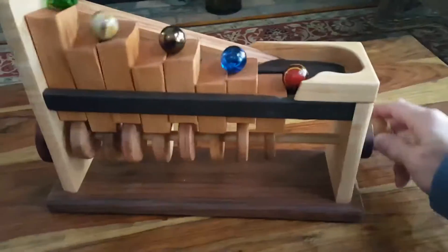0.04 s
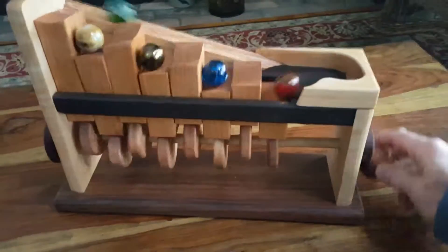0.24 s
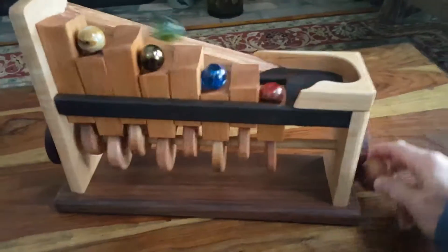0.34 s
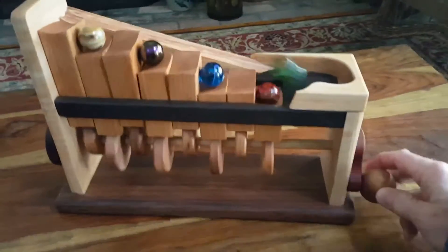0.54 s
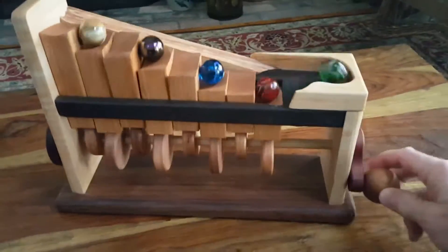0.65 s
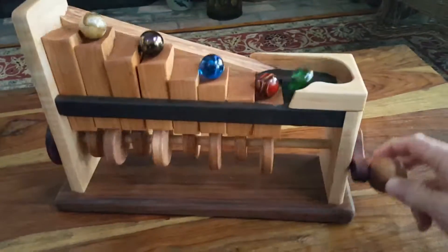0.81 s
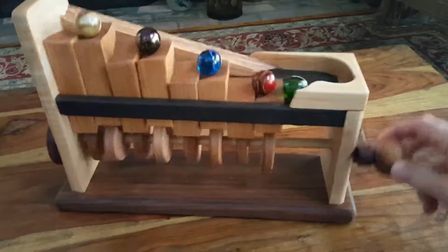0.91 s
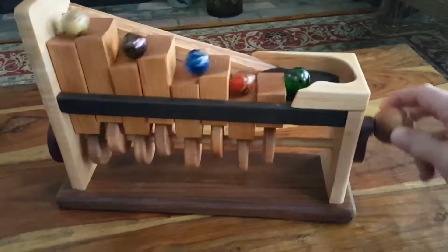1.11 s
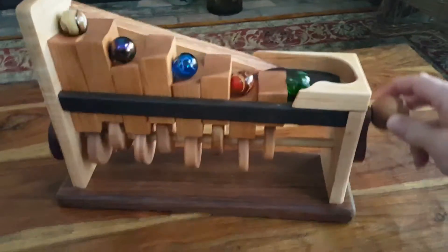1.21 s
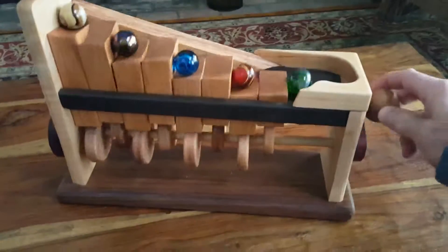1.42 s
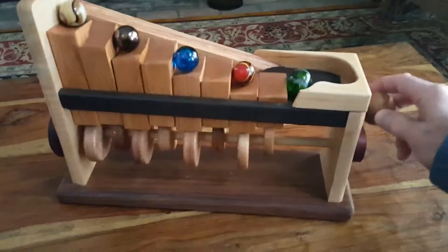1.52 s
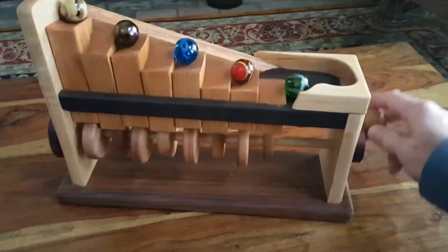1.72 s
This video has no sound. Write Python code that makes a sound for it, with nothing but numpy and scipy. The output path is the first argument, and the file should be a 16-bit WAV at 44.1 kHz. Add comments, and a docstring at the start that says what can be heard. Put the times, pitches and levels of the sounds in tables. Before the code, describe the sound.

Marbles knock irregularly against wood in a cranked marble machine on an indoor table. One rolls down the ramp and rattles into the tray with quickening bounces. A hollow knock follows, and the axle gives a faint groan.

```python
"""A glass marble clicks down the ramp of a hand-cranked wooden marble machine, drops into the tray and
bounces to rest. Each impact excites the damped modes of the wood it strikes and of the table below.
Cams lift stair blocks, and other marbles clack from step to step. The turning axle rumbles through
the table and groans once, with a squeak. A small room reverberates the impacts over a faint hiss."""
import sys
import numpy as np
from scipy import signal
from scipy.io import wavfile
from scipy.ndimage import uniform_filter1d, minimum_filter1d

SR = 44100
rng = np.random.default_rng(int(sys.argv[2]) if len(sys.argv) > 2 else 0)


def wav_record(signal):
    """Record a signal, one row per channel, as 16-bit PCM in the file named by sys.argv[1]."""
    frames = np.transpose(np.atleast_2d(signal))
    bounded = np.clip(frames, -1, 1)
    # unit amplitude maps onto the largest positive 16-bit level
    quanta = np.round(bounded * 32767).astype(np.int16)
    wavfile.write(sys.argv[1], SR, quanta)


N = 77175
TIME = np.arange(N) / SR

# Spectra of the noises and reflections. Each row: frequency in Hz, relative level in dB.
HISS_SPECTRUM = [(30, -49), (300, -1.5), (1500, 8.5), (3500, -6.5), (7000, -15.5), (10000, -21),
                 (13000, -14), (16000, -19.5)]
EARLY_SPECTRUM = [(150, -15.5), (700, 18), (1700, -5), (3000, -6), (6000, 3.5), (14000, -3)]
TAIL_SPECTRUM = [(100, -6), (300, -2.5), (700, 0.5), (1400, 1), (1700, -10), (1950, 0), (2600, -5.5),
                 (3600, -4.5), (6000, 0.5), (14000, -5.5)]
RUMBLE_SPECTRUM = [(25, -23.5), (60, -45.5), (95, -23.5), (125, -4.5), (155, -0.5), (185, -7), (250, -4),
                   (300, -12.5), (360, -18.5), (700, -19.5), (1500, -33), (4000, -53.5)]
ROLL_SPECTRUM = [(50, -31), (150, -20), (270, 0.5), (370, -13.5), (480, 6.5), (590, -1.5), (710, 5.5),
                 (1000, -2.5), (1350, -2.5), (1600, 6), (2100, -2.5), (2700, -13.5), (4000, -17.5),
                 (7500, -51), (16000, -72.5)]
CRACK_SPECTRUM = [(300, -26), (1500, -10), (3300, 9.5), (4500, -2.5), (6200, -8.5), (7400, -15.5),
                  (8300, -9), (10200, -23.5), (11500, -22), (12800, -18), (14000, -26), (16000, -35)]
# Reverberation of the room. Each row: frequency in Hz, 60 dB decay time in seconds.
ROOM_DECAY = [(150, 0.27), (400, 0.63), (1000, 0.32), (1950, 0.49), (3500, 0.48), (7000, 0.3),
              (14000, 0.28)]
# Envelopes of the axle and the rolling marble. Each row: time in seconds, level in dB.
RUMBLE_LEVELS = [(0, -39), (.09, -48), (.15, -42.5), (.45, -45), (.6, -41.5), (.82, -39), (1.0, -43.5),
                 (1.12, -52), (1.3, -44), (1.5, -51), (1.65, -47.5), (1.75, -41.5)]
ROLL_LEVELS = [(0, -52.5), (.14, -62), (.2, -48.5), (.25, -38), (.36, -37.5), (.45, -35), (.54, -35),
               (.6, -48.5), (.68, -31), (.9, -43), (1.0, -39), (1.04, -59), (1.5, -57), (1.62, -53),
               (1.75, -52)]
# Modes of the wooden parts. Each row: frequency in Hz, relative level in dB, 60 dB decay time in seconds.
TABLE_MODES = [(85.5, -40.5, .1), (129, -12.5, 0.2), (155.7, -5.5, .17), (236.8, -3.5, 0.057),
               (272.5, 0.5, 0.085), (315, -2, 0.023)]
BLOCK_MODES = [(508, -21, 0.027), (689, -17, 0.044), (960, -14.5, 0.036), (1204, -14, 0.026),
               (1535, -3, 0.039), (1604, -2.5, 0.018), (1845, -1.5, 0.016), (1940, -5, 0.011),
               (2297, -6, 0.03), (2500, -20, 0.01), (2600, -19.5, 0.011), (2940, -3, 0.0064),
               (3530, -9.5, 0.025), (3790, -7.5, 0.0094)]
STAIR_TOP_MODES = [(750, -24.5, 0.0067), (960, -30, 0.0097), (1153, 1, 0.012), (1188, 3, 0.013),
                   (1643, -12.5, 0.052), (1696, -5, 0.013), (2110, -9.5, 0.013), (2430, -11.5, 0.017),
                   (3020, -8.5, 0.0085), (2890, -14.5, 0.024), (3364, -2, 0.011)]
RAMP_MODES = [(703, -29.5, 0.06), (1300, -16, 0.0053), (1614, -12, .018), (1900, -5, 0.014),
              (2250, -6, 0.015), (2680, 2, 0.008), (2940, -6.5, 0.0089), (3190, -7, 0.0064),
              (3660, -7, 0.01), (5800, -22, .008), (7740, -24, .01)]
RIM_MODES = [(1560, -9.5, .015), (1900, -4, 0.022), (2420, -5, 0.013), (2700, -15.5, .012),
             (3160, -0.5, 0.0081), (3490, -9, 0.012)]
TRAY_MODES = [(475.6, -26, 0.066), (707, -24.5, .055), (960, -19.5, 0.012), (1170, -32, 0.0058),
              (1603, -1, 0.016), (1825, 3.5, 0.014), (1935, 3.5, 0.016), (1940, -19, 0.025),
              (2284, -15.5, 0.041), (2965, -8, 0.012), (2960, -40, 0.01), (3300, -8.5, 0.015),
              (3716, -16.5, 0.041)]
# Thin, high rings of a marble. Each row: start in seconds, level in dB, frequency in Hz.
MARBLE_PINGS = [(0.2313, -25.5, 5484), (.3106, -29, 5830), (1.238, -39, 5910)]
# Impacts on each part. Each row: start in seconds, ring gain in dB, contact cut-off in Hz,
# accent frequency in Hz, thud gain in dB, crack gain in dB, left over right in dB.
BLOCK_CLACKS = [(.0190, -30.5, 1500, 1140, -35, -67, 4), (.1596, -20, 2000, 1296, -27.5, -33.5, 3.4),
                (.2070, -26, 1800, 1390, -27, -43, 3), (.2165, -10.5, 3800, 2100, -29, -20.5, 3.4),
                (.2295, -34, 4000, 1660, -59, -25, 2.5), (.3170, -20, 2200, 1550, -53, -47, 4.6),
                (.3970, -21, 2600, 1700, -32, -25, 4.5), (.4415, -22, 2800, 2270, -27.5, -31.5, 5.1),
                (.4757, -18, 2600, 1980, -34, -26.5, 2.1), (.4985, -37, 2400, 1580, -34.5, -33, 3.8),
                (.5160, -16, 2300, 1830, -35, -26, 4.8), (.5315, -50, 1900, 1590, -40, -54, 2.6),
                (.5590, -16.5, 2200, 1840, -39, -17, 7), (1.2395, -17, 3000, 1390, -50, -25, 2.5),
                (1.2852, -18, 2800, 2020, -38.5, -24.5, 3), (1.6090, -29.5, 1900, 1530, -41.5, -65, 2.5),
                (1.6430, -37, 1600, 1600, -78, -65.5, 4.5), (1.6770, -45, 1700, 1560, -41, -49, 1.5)]
STAIR_TOP_KNOCKS = [(.0315, -28, 1670, 1190, -45, -64, 4.2), (.2330, -4, 2400, 1700, -28, -17, 5.1),
                    (1.2225, -3, 1950, 1102, -33, -23.5, 4), (1.3065, -15, 1185, 1190, -42, -61, 1.5)]  # hollow knocks at the top of the stairs
RAMP_CLICKS = [(.2528, -22.5, 4500, 2985, -45, -37.5, 3.3), (.2854, -12.5, 5000, 3000, -31.5, -15, 6),
               (.3105, -14.5, 5050, 2800, -35.5, -14, 8.5), (.3936, -13.5, 4200, 2480, -37, -16.5, 7.2),
               (.5547, -24.5, 4200, 2800, -25, -20, 4.5), (.5572, -16.5, 3000, 2360, -29, -42, 2.1),
               (1.1984, -16.5, 4500, 2680, -45, -18.5, 3.3), (1.2548, -15, 5000, 3700, -40.5, -27, 3.9)]
RIM_GLANCES = [(.6727, -4, 4500, 3300, -32, -21, 6), (.7003, -11, 3500, 2100, -38, -28, 4),
               (.7076, -7, 5000, 3400, -38, -20, 7)]
TRAY_BOUNCES = [(.6306, -2.5, 3700, 1660, -21, -15, 5), (.6512, -4.5, 2750, 1910, -24.5, -24, 1),
                (.7078, -4, 4430, 1910, -35, -3, 2), (.7931, -3, 3340, 1734, -18, -12.5, 4),
                (.8535, -5, 3000, 1697, -23.5, -15.5, 4.5), (.8955, -6.5, 2390, 1683, -25.5, -30.5, 2.5),
                (.9219, -7, 2200, 1770, -35.5, -25, 4), (.9385, -9, 1610, 1750, -27.5, -40, 1),
                (.9610, -32, 3000, 1700, -32, -40, -4), (.9803, -16.5, 1870, 1880, -30.5, -41, 0)]


def amp(db):
    """Amplitude grows tenfold for every 20 dB."""
    return 10 ** (np.asarray(db) / 20)


def unit_rms(x):
    """Normalisation brings the mean power to 1."""
    return x / np.sqrt(np.mean(x ** 2) + 1e-20)


def value_at(curve, hz):
    """Interpolation on a logarithmic frequency axis."""
    curve_hz, values = np.transpose(curve)
    return np.interp(np.log(hz + 1), np.log(curve_hz), values)


def envelope(levels):
    """Straight lines in dB give exponential growth and decay."""
    return amp(np.interp(TIME, *np.transpose(levels)))


def add(mix, start_s, sound):
    """Superposition: a sound sums into the mix from its start time."""
    part = mix[:, max(round(start_s * SR), 0):][:, :sound.shape[-1]]
    part += sound[..., :part.shape[1]]


def colour(x, spectrum):
    """A minimum-phase filter imposes a spectrum causally."""
    hz = abs(np.fft.fftfreq(4096, 1 / SR))
    log_gain = np.log(amp(value_at(spectrum, hz)))
    taps = np.fft.ifft(np.exp(np.conj(signal.hilbert(log_gain)))).real
    return signal.fftconvolve(x, taps[None], axes=1)[:, :x.shape[1]]


def stereo(x, coherence, left_db):
    """Coherence sets the width of a noise pair; a level difference sets its direction."""
    right = coherence * x[0] + np.sqrt(1 - coherence ** 2) * x[1]
    return np.array([x[0] * amp(left_db / 2), right * amp(-left_db / 2)])


def noise(samples):
    """Two independent channels of white noise."""
    return rng.standard_normal((2, samples))


def hiss():
    """Stationary broadband noise forms a faint floor."""
    return amp(-57) * unit_rms(colour(noise(N), HISS_SPECTRUM))


def room(x, onset_s=.0044, early_t60_s=.029):
    """Reflection: the frame and table top scatter sound early, then a diffuse tail dies band by band."""
    hz, frame_s, bands = signal.stft(noise(SR), SR, nperseg=256)
    coherence = 1 / (1 + (hz[:, None] / 900) ** 2)  # the bass is alike at both ears
    bands = stereo(bands, coherence, left_db=0) * amp(-60 * frame_s / value_at(ROOM_DECAY, hz)[:, None])
    tail = signal.istft(bands, SR, nperseg=256)[1][:, :SR]
    t = np.arange(SR) / SR
    tail = colour(unit_rms(tail * np.minimum(t / onset_s, 1) ** 2), TAIL_SPECTRUM)
    early = stereo(noise(SR), coherence=.23, left_db=-13) * amp(-60 * t / early_t60_s) * (t > .002)
    early = colour(unit_rms(early), EARLY_SPECTRUM)
    response = (amp(-7.5) * tail + amp(-15) * early) / np.sqrt(SR)
    return signal.fftconvolve(x, response, axes=1)[:, :N]


def axle_rumble():
    """Structure-borne sound: the rubbing of the cams travels through the table as low noise."""
    rubbing = stereo(noise(N), coherence=.97, left_db=-.1)
    return envelope(RUMBLE_LEVELS) * unit_rms(colour(rubbing, RUMBLE_SPECTRUM))


def axle_tone(start_s, length_s, hz, db, fade_s=.05):
    """Friction in the dry axle sustains a soft tone, unsteady in pitch and amplitude."""
    out, t = np.zeros((2, N)), np.arange(0, length_s, 1 / SR)
    waver, flutter = unit_rms(uniform_filter1d(noise(N), size=400))[:, :len(t)]
    fade = np.minimum(np.minimum(t, length_s - t) / fade_s, 1)
    phase = 2 * np.pi * np.cumsum(hz * (1 + .008 * waver)) / SR
    add(out, start_s, amp(db) * fade * (1 + .12 * flutter) * np.sin(phase))
    return out


def rolling(bumps_per_s=1200):
    """Surface roughness: the grain of the wood gives the rolling marble a train of random impulses."""
    bumps = noise(N) * (rng.random(N) < bumps_per_s / SR)
    bumps = stereo(bumps, coherence=.7, left_db=2.5)
    return envelope(ROLL_LEVELS) * unit_rms(colour(bumps, ROLL_SPECTRUM))


def ring(modes, t, weight=1, swells=True, rise_s=.00033):
    """Free vibration is a sum of damped sines: alternating signs swell briefly, like signs snap."""
    hz, db, t60 = np.transpose(modes)
    t = np.maximum(t, 0)[..., None]
    onset = (-1) ** np.arange(len(hz)) if swells else 1 - np.exp(-t / rise_s)
    return (weight * onset * amp(db - 60 * t / t60) * np.sin(2 * np.pi * hz * t)).sum(-1)


def pings(t60_s=.032):
    """A single high mode of a marble rings briefly after a few contacts."""
    out, t = np.zeros((2, N)), np.arange(SR // 10) / SR
    for start_s, db, hz in MARBLE_PINGS:
        add(out, start_s, ring([(hz, db, t60_s)], t))
    return out


def impacts(rows, modes, right_lag_s, swells=True, accent_db=4.5, accent_octaves=.18, crack_t60_s=.013):
    """Impulsive excitation: each blow rings the wood, cracks at the contact and thuds into the table."""
    out, t = np.zeros((2, N)), np.arange(2000) / SR
    hz = np.transpose(modes)[0]
    thud = ring(TABLE_MODES, np.arange(SR // 4) / SR)
    for start_s, ring_db, contact_hz, accent_hz, thud_db, crack_db, left_db in rows:
        # The spot struck favours the modes near its accent frequency.
        accent = amp(accent_db * np.exp(-(np.log2(hz / accent_hz) / accent_octaves) ** 2))
        contact_lowpass = 1 / np.hypot(1, (hz / contact_hz) ** 2)
        wood = amp(ring_db) * ring(modes, np.array([t, t - right_lag_s]), accent * contact_lowpass, swells)
        burst = stereo(noise(len(t)), coherence=.16, left_db=-5) * amp(-60 * t / crack_t60_s)
        crack = amp(crack_db) * colour(burst, CRACK_SPECTRUM)
        pan = amp([[left_db / 2], [-left_db / 2]])
        add(out, start_s, (wood + crack) * pan)
        add(out, start_s, amp(thud_db) * thud)
    return out


def stairs():
    """Collisions with marbles excite hollow modes at the stair top and clacking modes in the blocks."""
    knocks = impacts(STAIR_TOP_KNOCKS, STAIR_TOP_MODES, right_lag_s=.00008)
    return knocks + impacts(BLOCK_CLACKS, BLOCK_MODES, right_lag_s=.00008)


def falling_marble():
    """Inelastic collisions: the marble clicks on the ramp rails, glances off the rim and settles."""
    tray = impacts(TRAY_BOUNCES, TRAY_MODES, right_lag_s=.00011)
    rim = impacts(RIM_GLANCES, RIM_MODES, right_lag_s=.00005)
    ramp = impacts(RAMP_CLICKS, RAMP_MODES, right_lag_s=.00005, swells=False)
    return tray + rim + ramp


def scene():
    """The sources superpose; a low cut, like a microphone's roll-off, removes sub-bass from the knocks."""
    low_cut = signal.butter(2, 95, "high", fs=SR, output="sos")
    hits = signal.sosfilt(low_cut, falling_marble() + stairs() + pings())
    background = hiss() + room(hits) + rolling() + axle_rumble()
    groan = axle_tone(start_s=1.5, length_s=.17, hz=152.5, db=-38.5)
    squeak = axle_tone(start_s=1.512, length_s=.07, hz=712, db=-47)
    return background + groan + squeak + hits


def record(dry, ceiling=.96, limiter_s=.002, cutoff_hz=16400):
    """Peak limiting holds down the loudest knocks; a low-pass filter then bounds the bandwidth."""
    window = int(limiter_s * SR)
    gain = ceiling / np.maximum(abs(dry).max(0), ceiling)
    gain = uniform_filter1d(minimum_filter1d(gain, window), window)
    taps = signal.firwin(511, cutoff_hz, window=("kaiser", 9), fs=SR)
    return signal.oaconvolve(dry * gain, taps[None], "same")


dry = scene()
out = record(dry)
wav_record(out)
```